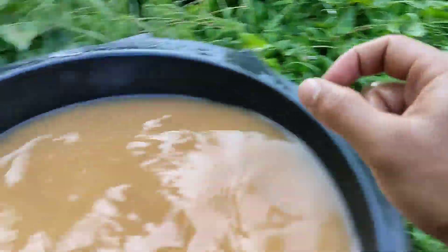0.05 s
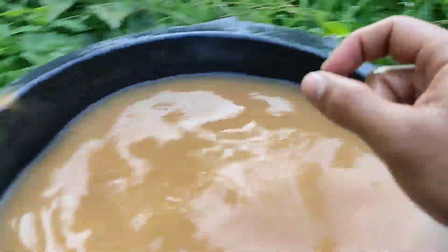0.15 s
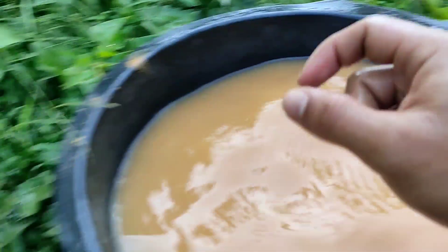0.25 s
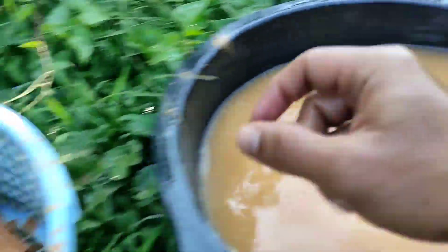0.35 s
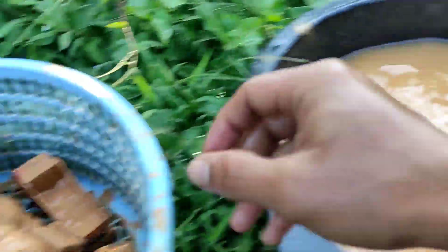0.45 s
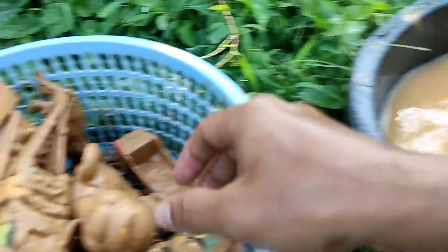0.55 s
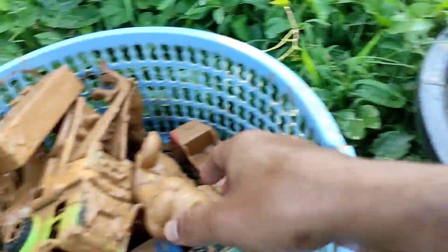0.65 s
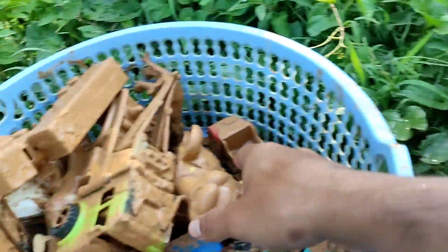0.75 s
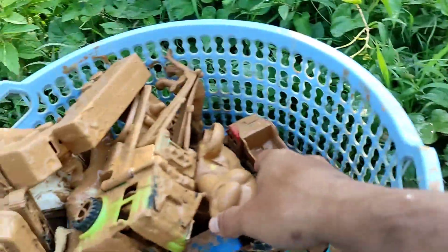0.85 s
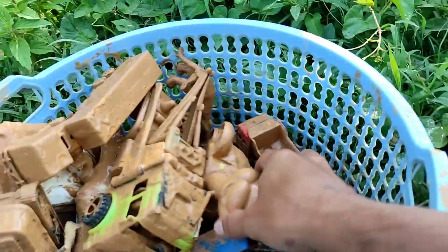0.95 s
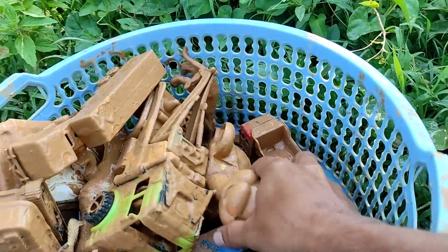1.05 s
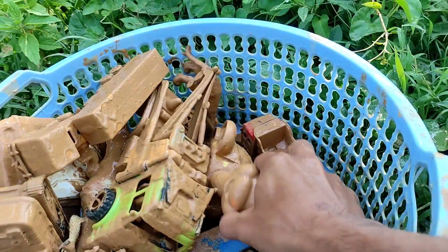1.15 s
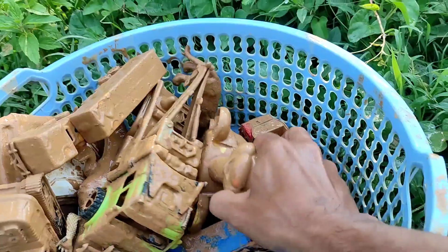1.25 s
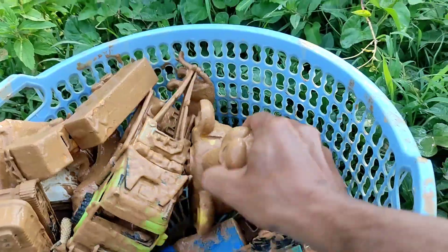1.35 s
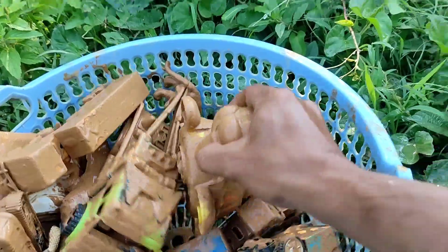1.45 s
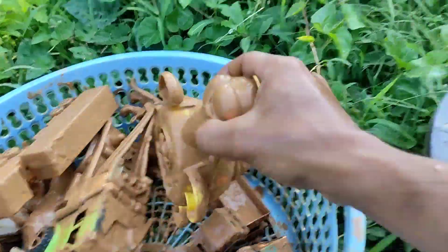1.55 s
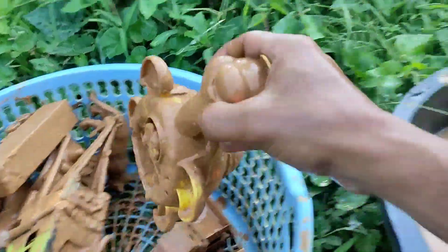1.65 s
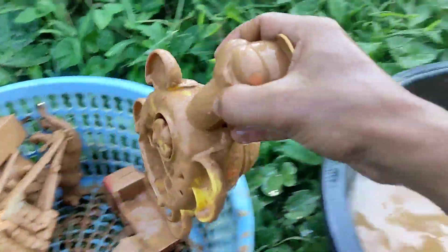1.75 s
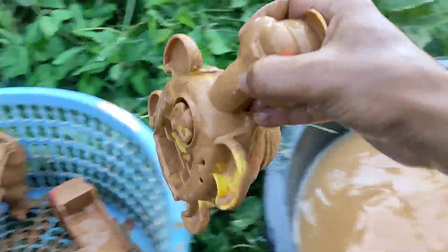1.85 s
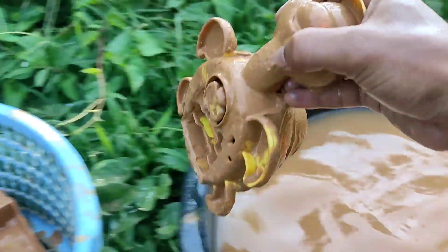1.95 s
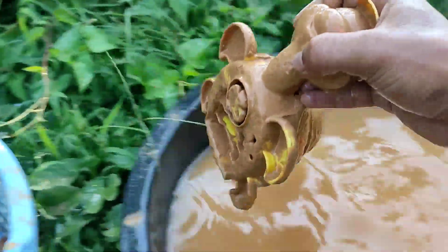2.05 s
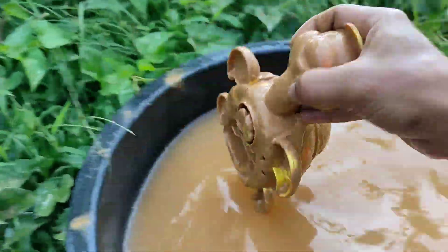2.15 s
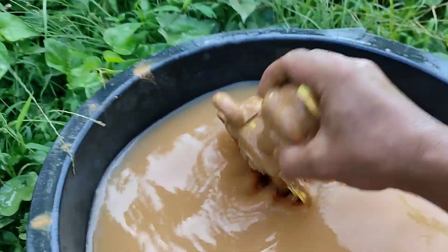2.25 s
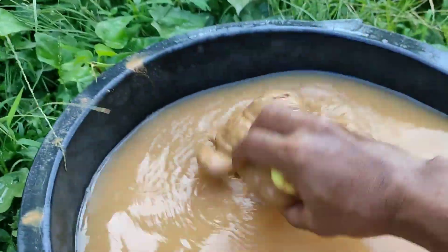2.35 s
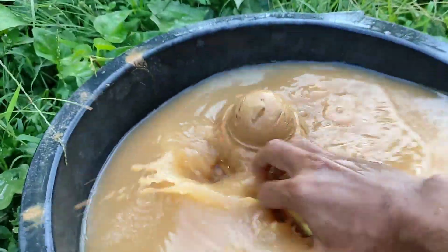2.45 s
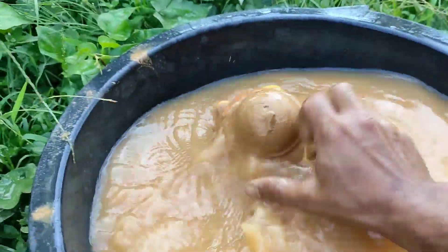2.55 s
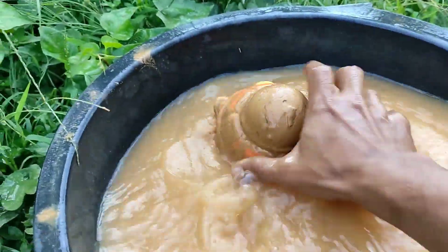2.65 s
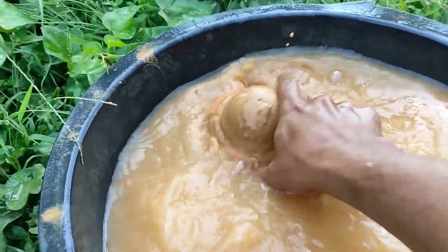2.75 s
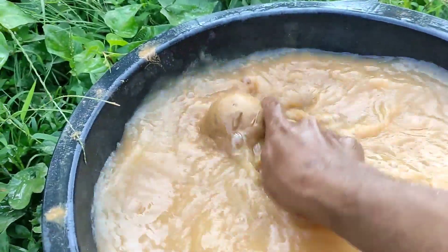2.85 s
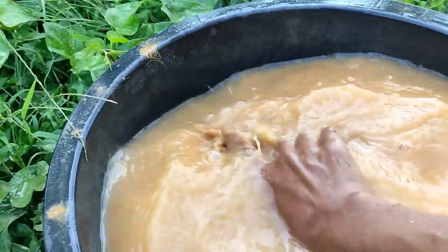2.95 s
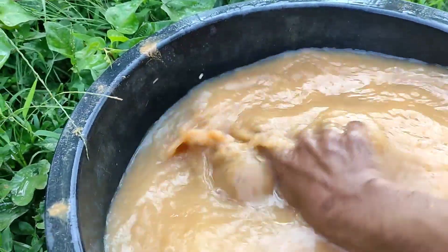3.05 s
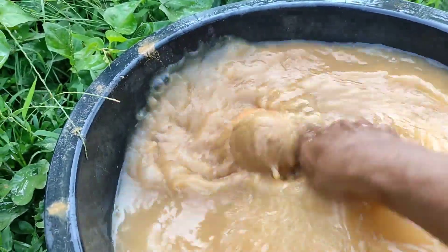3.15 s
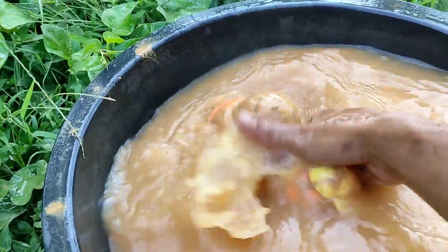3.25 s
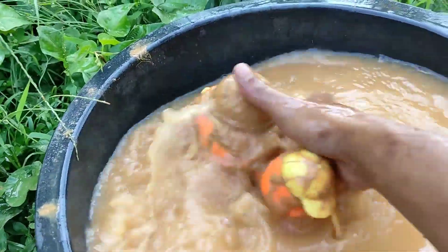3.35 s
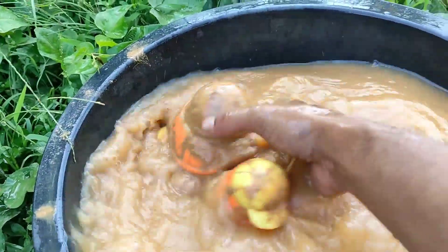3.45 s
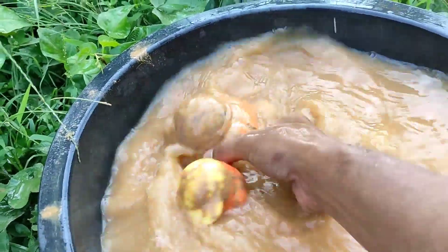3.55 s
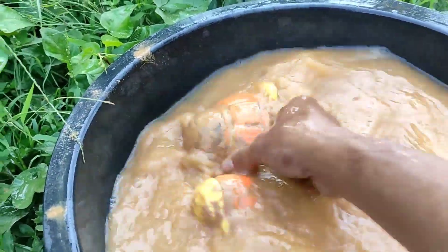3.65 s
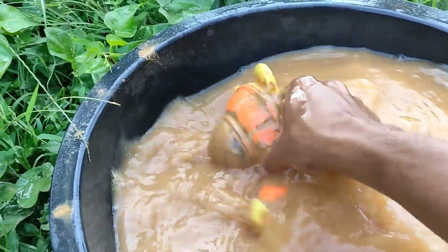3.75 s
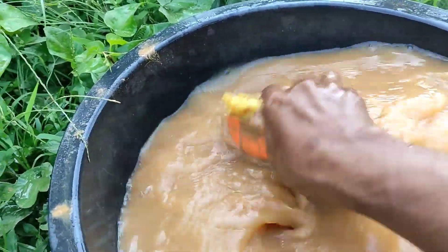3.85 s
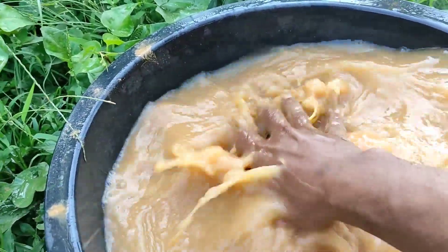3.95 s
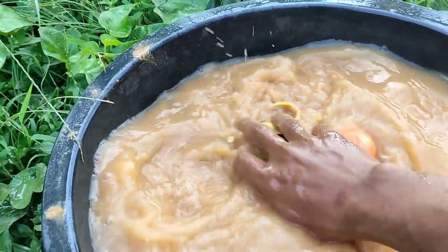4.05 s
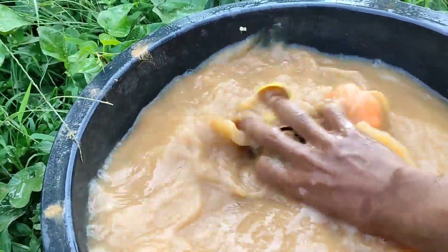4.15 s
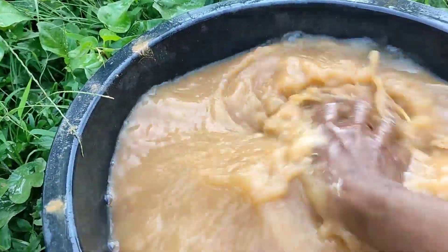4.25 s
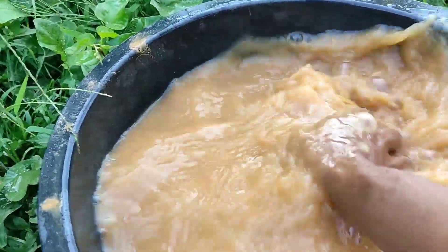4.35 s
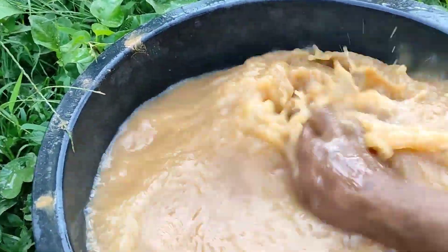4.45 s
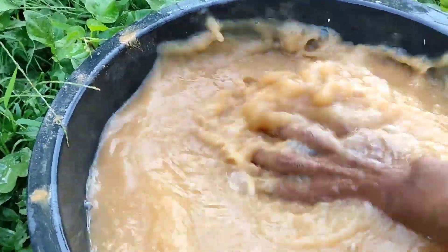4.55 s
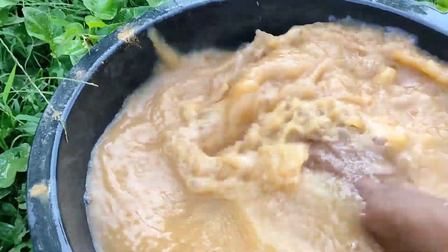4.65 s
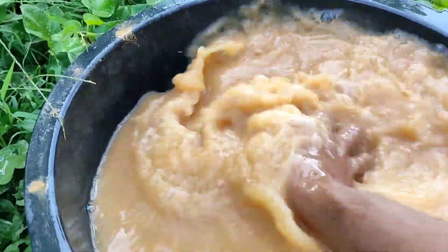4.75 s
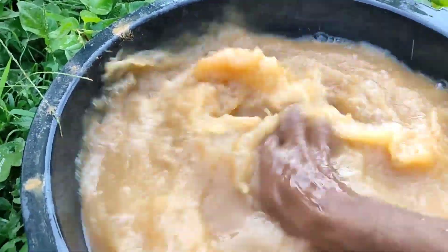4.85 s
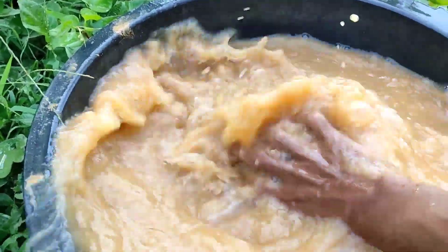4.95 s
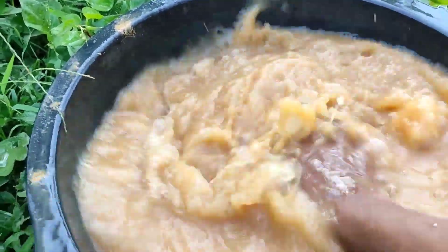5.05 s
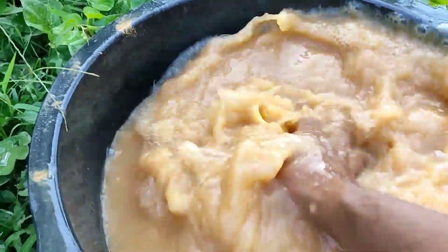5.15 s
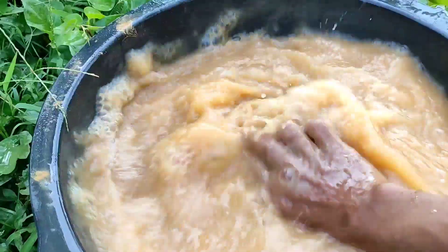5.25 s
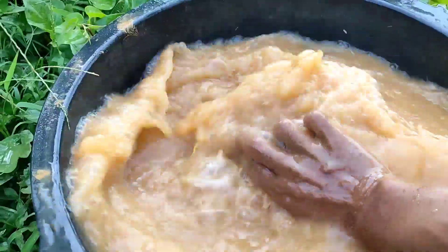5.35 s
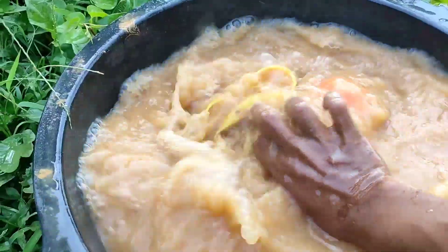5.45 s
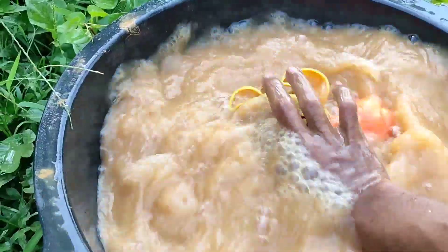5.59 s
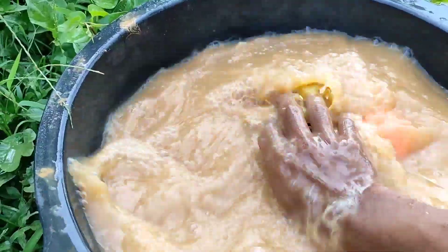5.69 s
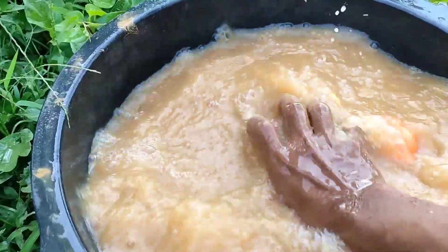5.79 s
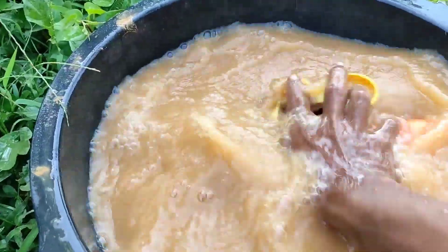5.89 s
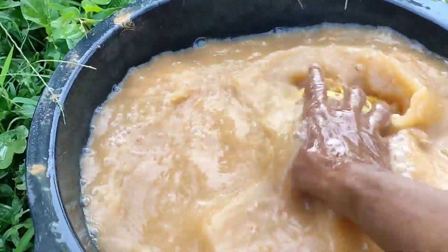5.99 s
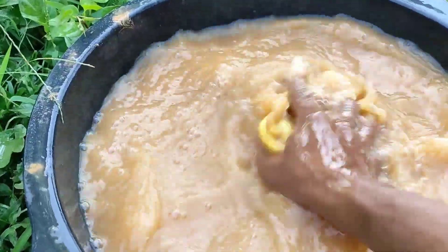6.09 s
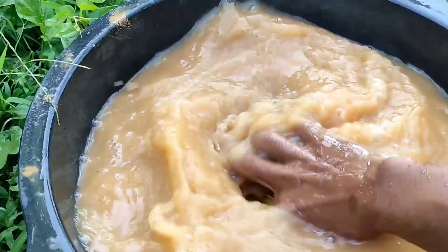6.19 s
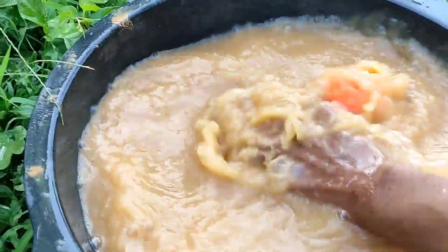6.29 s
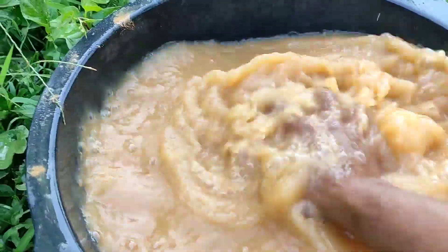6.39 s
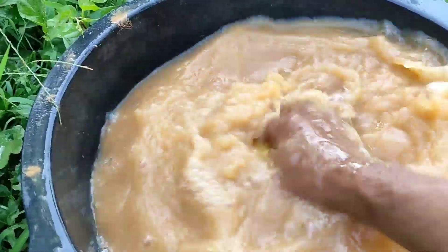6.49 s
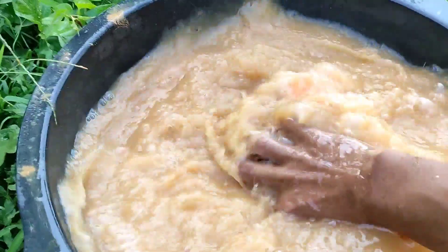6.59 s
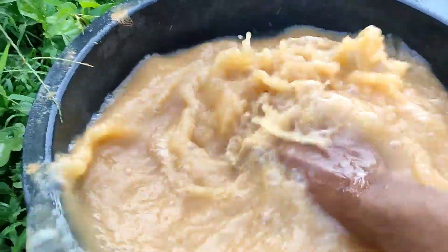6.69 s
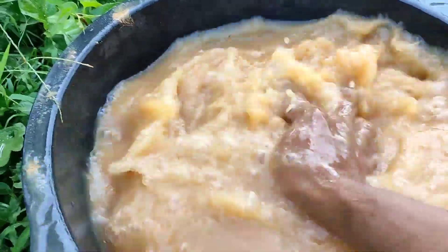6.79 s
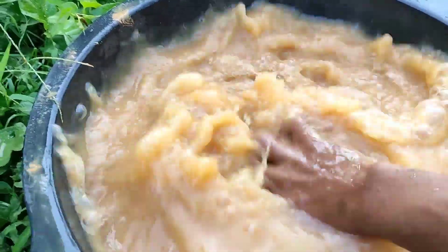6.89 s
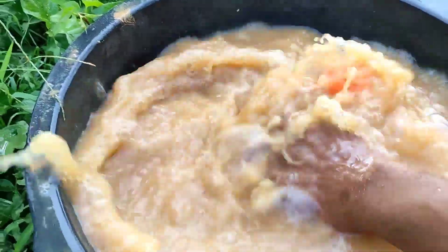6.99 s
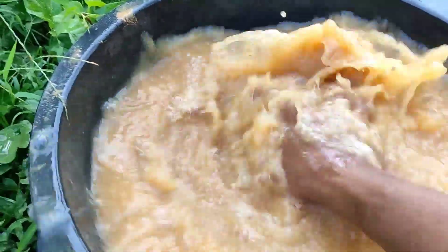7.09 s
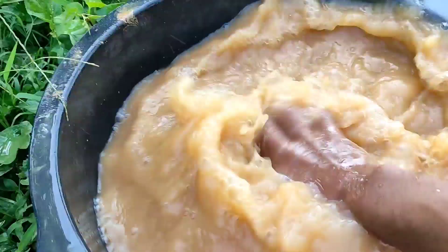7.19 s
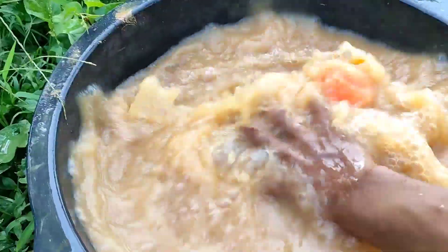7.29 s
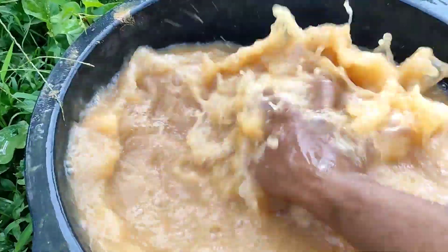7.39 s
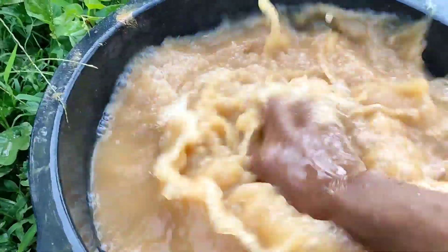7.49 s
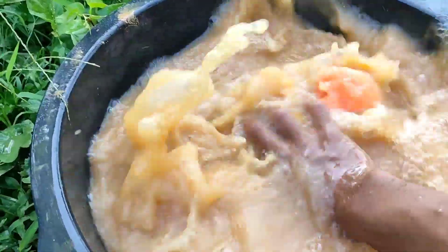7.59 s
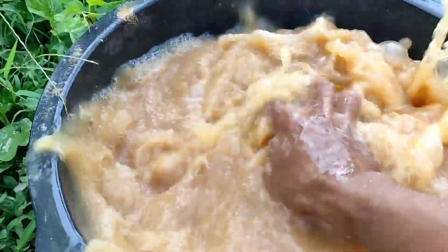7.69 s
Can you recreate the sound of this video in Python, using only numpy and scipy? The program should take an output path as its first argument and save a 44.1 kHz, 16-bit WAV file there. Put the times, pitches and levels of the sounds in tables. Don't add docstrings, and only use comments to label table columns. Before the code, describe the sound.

Faint taps and a short plastic scrape give way to close, wet sloshing, bubbly gulps and crisp droplets as a hand churns water in a tub.

```python
import sys
import numpy as np
from scipy import signal
from scipy.fft import rfft, irfft, next_fast_len
from scipy.io import wavfile
from scipy.ndimage import uniform_filter1d, map_coordinates

SR = 44100
rng = np.random.default_rng(int(sys.argv[2]) if len(sys.argv) > 2 else 0)


def amplitude_ratio(level_db):
    exponent = np.asarray(level_db, float) / 20
    return 10 ** exponent


def waveform_to_disk(signal):
    frames = np.transpose(np.atleast_2d(signal))
    scaled = np.clip(frames, -1, 1) * 32767
    samples = np.round(scaled).astype(np.int16)
    wavfile.write(sys.argv[1], SR, samples)


N = 340893


def unit(x):
    return x / np.sqrt(np.mean(x ** 2) + 1e-20)


def along(points, hz):
    f, v = np.transpose(points)
    return np.interp(np.log(hz + 1), np.log(f + 1), v)


def gains(*tables):
    t, total = np.arange(N) / SR, 0
    for rows in tables:
        s, *columns = np.transpose(rows)
        total = total + np.array([amplitude_ratio(np.interp(t, s, db, -120, -120)) for db in columns])
    return total


def wobble(rate):
    knots = rng.standard_normal(int(N * rate / SR) + 4)
    return map_coordinates(knots, [np.arange(N) * rate / SR])


def filtered(x, response):
    m = next_fast_len(N + 8192)
    return irfft(rfft(x, m) * response(np.fft.rfftfreq(m, 1 / SR)), m)[..., :N]


def rush(spectrum, lag_s, patchy_db):
    z = signal.stft(rng.standard_normal((2, N)), nperseg=256)[2]
    patches = uniform_filter1d(rng.standard_normal(z.shape[1:]), size=6, axis=0)
    patches = uniform_filter1d(patches, size=5, axis=1)
    pair = signal.istft(z * amplitude_ratio(patchy_db * unit(patches)), nperseg=256)[1][:, :N]

    def mid_and_side(hz):
        coherence = .97 * np.exp(-.5 * (2 * np.pi * hz * lag_s) ** 2)
        turn = np.arccos(coherence) / 2
        return amplitude_ratio(along(spectrum, hz)) * [np.cos(turn), np.sin(turn)]

    mid, side = filtered(pair, mid_and_side)
    return unit(np.array([mid + side, mid - side]))


def bubbles(s, db, first_hz, last_hz, swell_s, fade_s, lag_s, size):
    columns = (s, db, first_hz, last_hz, swell_s, fade_s)
    s, db, first_hz, last_hz, swell_s, fade_s = (np.asarray(v, float)[:, None] for v in columns)
    place = rng.standard_normal((len(s), 2))
    start = np.round((s - 2 * swell_s) * SR).astype(int) + np.arange(size)
    glide = (last_hz - first_hz) / (.75 * (swell_s + fade_s))
    top = 1.6 * (swell_s + fade_s)
    out = []
    for side in (.5, -.5):
        t = start / SR - s - side * lag_s * place[:, :1]
        swelling = -.8 * t / swell_s + (t / swell_s / 1.3) ** 8
        fading = .6 * t / fade_s + .4 * (t / fade_s) ** 3
        shape_db = -8 * np.where(t < 0, swelling, fading)
        since = t + swell_s
        cycles = first_hz * since + glide * np.where(since < top, since ** 2 / 2, top * (since - top / 2))
        wave = amplitude_ratio(db + shape_db + 0.5 * side * place[:, 1:]) * np.sin(2 * np.pi * cycles)
        out.append(np.bincount(np.clip(start, 0, N).ravel(), wave.ravel(), N + 1)[:N])
    return np.array(out)


def swarm(count, low_hz, high_hz, cycles, rise, spread_db, size):
    u = rng.random((count, 5))
    hz = low_hz * (high_hz / low_hz) ** u[:, 1]
    life = cycles * (0.4 + 1.272 * u[:, 2]) / hz
    db = -spread_db * np.log(1 - .94 * u[:, 3]) + 10 * np.log10(hz / life / hz ** .5)
    last_hz = hz * (1 + rise * u[:, 4])
    return unit(bubbles(u[:, 0] * N / SR, db, hz, last_hz, 0.395 * life, life, lag_s=.00012, size=size))


# frequency in Hz, level in dB.
FIELD_SPECTRUM = [(15, -49), (25, -26), (78, -5), (135, -2.5), (309, -14), (1740, -28.5), (4900, -32),
                  (5600, -35.5), (7800, -35.5), (9400, -25.5), (10500, -29.5), (12500, -34.5), (15300, -43),
                  (16000, -60)]
# time in seconds, level in dB.
TRAFFIC_HUM = [(0.0, -52), (1.698, -50), (2.466, -48), (4.165, -46.5), (4.488, -54), (5.41, -49.5),
               (6.615, -48.5), (7.728, -44.5)]


def field():
    far = rush(FIELD_SPECTRUM, lag_s=0.00051, patchy_db=1.24)
    low = filtered(far, lambda f: 1 / (1 + (f / 250) ** 4))
    wing = np.sin(np.pi * 142 * np.arange(N) / SR) ** 4
    buzz = filtered(rng.standard_normal((2, N)), lambda f: np.exp(-.5 * ((f - 11800) / 260) ** 2))
    hum = gains(TRAFFIC_HUM)[0] * amplitude_ratio(6.5) * low
    return hum + amplitude_ratio(-43.0) * (far - low) + amplitude_ratio(-60.5 + wobble(0.22)) * unit(wing * buzz)


# frequency in Hz, reverberation time T60 in seconds.
YARD_DECAY = [(300, 0.082), (2000, 0.083), (10000, 0.041)]


def yard(x):
    hz, t, z = signal.stft(rng.standard_normal((2, SR // 5)), SR, nperseg=128)
    tail = signal.istft(z * amplitude_ratio(-60 * t / along(YARD_DECAY, hz)[:, None]), SR, nperseg=128)[1]
    return signal.fftconvolve(x, tail / np.linalg.norm(tail[0]), axes=1)[:, :N]


# time in seconds, peak in dB, mode in Hz, T60 in seconds.
TAPS = [(0.0033, -30, 143, 0.24), (0.14, -30, 110, 0.29), (.141, -25, 235, 0.19), (.139, -29, 1300, 0.027),
        (0.034, -25.5, 420, 0.025), (.115, -31, 1300, 0.035), (.094, -35, 10000, .03),
        (1.465, -18, 2100, 0.1), (0.52, -33, 570, 0.044), (3.895, -20.5, 710, 0.024),
        (6.043, -19, 1490, 0.021), (0.074, -13, 3280, 0.0042), (2.2, -42, 820, 0.47),
        (6.89, -16.5, 370, 0.24), (0.258, -38, 12000, 0.01), (.82, -33, 11500, .008),
        (4.255, -26, 140, 0.12), (2.021, -34, 8000, .03), (3.087, -20.5, 256, 0.063),
        (5.28, -32, 150, 0.09), (5.68, -18.5, 206, 0.046), (7.235, -5, 360, 0.019)]


def knocks():
    out, t = np.zeros((2, N)), np.arange(SR // 5) / SR
    for s, db, hz, t60 in TAPS:
        drift = np.cumsum(rng.standard_normal(len(t))) * 0.75 * np.sqrt(hz / SR)
        contact = 1 - np.exp(-(t * hz / 0.5) ** 2)
        tap = amplitude_ratio(db - 60 * t / t60) * contact * np.sin(2 * np.pi * hz * t + drift)
        out[:, round(s * SR):][:, :len(t)] += tap
    return out


# frequency in Hz, level in dB.
BASKET_SPECTRUM = [(110, -47), (180, -33), (244, 0.5), (425, -4), (627, -13), (882, -5), (2010, -3.5),
                   (3000, -17), (3900, -23), (6600, -120)]
# frequency in Hz, level in dB.
FOAM_SPECTRUM = [(500, -57), (1300, 0.5), (2000, -3), (4600, -5.5), (6600, -10.5), (7200, -13),
                 (8850, -6.5), (12000, -11.5), (14900, -16.5), (16300, -24)]
# time in seconds, pressure in dB, sliding speed from 0 to 1.
TOY_DRAG = [
    (1.251, -62, 0.2),
    (1.303, -41.5, 0.43),
    (1.341, -41.5, 0.12),
    (1.421, -35.5, 0.12),
    (1.471, -44, 0.82),
    (1.519, -31, 0.4),
    (1.616, -32, 0.03),
    (1.672, -42, 0.22),
    (1.698, -56, 0.1),
]


def drag():
    s, pressure_db, speed = np.transpose(TOY_DRAG)
    shell_db = pressure_db - 12 + 33 * speed
    grit_db = pressure_db - 7.5 + 21.5 * speed
    rub, shell, grit = gains(np.transpose([s, pressure_db, shell_db, grit_db]))
    slips = amplitude_ratio(2.8 * wobble(230) + 1.1 * wobble(40))
    scrape = slips * rush(BASKET_SPECTRUM, lag_s=.00015, patchy_db=2)
    dull = filtered(scrape, lambda f: 1 / (1 + (f / 1100) ** 6))
    gritty = slips * rush(FOAM_SPECTRUM, lag_s=0.00013, patchy_db=-3.0)
    return rub * unit(dull) + shell * unit(scrape - dull) + grit * unit(gritty)


# time in seconds, effort in dB.
STIR_EFFORT = [(2.29, -65), (2.44, -29), (2.55, -31.5), (2.64, -44.5), (3.68, -42), (3.77, -46.5),
               (3.93, -45), (3.98, -32), (4.3, -35), (4.68, -25), (4.9, -42), (5.1, -24), (5.5, -34),
               (6.03, -39), (6.3, -35), (6.575, -28), (6.63, -25.5), (7.73, -24.5)]
# crest in seconds, crest level in dB, ebb in seconds,
# spray over churn in dB.
STROKE_WAVES = [(0.001, -32, 0.02, -26), (0.086, -35.5, 0.1, 2), (2.479, -50, 0.039, -19),
                (2.591, -31.5, 0.088, 0.5), (2.768, -30.5, 0.1, -6), (2.861, -29.5, 0.034, -3.5),
                (2.94, -28, 0.072, 1.5), (3.029, -21.5, 0.017, -1), (3.103, -27, 0.042, -4),
                (3.405, -54, 0.52, 14), (3.736, -33.5, 0.028, -10), (4.117, -29, 0.068, 6),
                (4.53, -54, 0.19, 16), (4.684, -22, 0.03, -17), (4.793, -24.5, 0.12, -12),
                (4.965, -22, 0.1, -5), (5.084, -22.5, 0.049, -4.5), (5.343, -27, 0.12, -6),
                (5.449, -22, 0.072, -20), (5.549, -32, 0.092, 4), (5.767, -26, 0.027, -7),
                (5.934, -32.5, 0.031, -9), (6.088, -27, 0.021, -12), (6.253, -34, 0.074, 4),
                (6.371, -23, 0.17, -6.5), (7.11, -31, 0.52, -26), (7.444, -30, 0.086, -0.5),
                (7.601, -23.5, 0.1, -5)]
# time in seconds, dip in dB, half length in seconds.
HAND_TURNS = [
    (2.624, -30, 0.0096),
    (5.229, -9, 0.014),
    (5.526, -6, 0.025),
    (6.572, -8, 0.011),
    (7.253, -9, 0.0048),
]


def stirring():
    t = np.arange(N) / SR
    both = gains(STIR_EFFORT) * amplitude_ratio([[0], [-3]])
    ebb_db, build, crest = 37, 0.87, 1.45
    for s, db, ebb_s, spray_db in STROKE_WAVES:
        away = np.where(t < s, (s - t) / build, t - s) / ebb_s
        both = both + amplitude_ratio(db - ebb_db * away ** crest) * amplitude_ratio([[0], [spray_db]])
    dip_db = sum(db * np.exp(-((t - s) / half_s) ** 2) for s, db, half_s in HAND_TURNS)
    return both * amplitude_ratio(dip_db)


# frequency in Hz, level in dB.
TUB_SPECTRUM = [(71, -41), (120, -23.5), (424, -2), (623, -4.5), (806, -3), (1110, -9.5), (1550, -7),
                (1930, -18), (2600, -19), (3380, -15), (5720, -120)]


def slosh():
    churn, spray = stirring()
    busy = np.clip(uniform_filter1d(spray, size=9000) / amplitude_ratio(-30), 0, 1)
    surge = wobble(28)

    gurgle = swarm(count=2900, low_hz=150, high_hz=2600, cycles=4.4, rise=.45, spread_db=2.9, size=1500)
    gurgle = unit(filtered(gurgle, lambda f: amplitude_ratio(along(TUB_SPECTRUM, f))))
    body = gurgle + amplitude_ratio(-12 + 4 * busy) * rush(TUB_SPECTRUM, lag_s=.00014, patchy_db=3)
    deep = filtered(body, lambda f: 1 / (1 + (f / 1000) ** 6))
    body = body - deep + amplitude_ratio(-11.0 + 5.9 * busy) * deep

    fizz = swarm(count=6500, low_hz=2000, high_hz=15500, cycles=2.4, rise=.15, spread_db=5, size=260)
    fizz = unit(filtered(fizz, lambda f: amplitude_ratio(along(FOAM_SPECTRUM, f))))
    foam = fizz + amplitude_ratio(-5 + 9 * busy) * rush(FOAM_SPECTRUM, lag_s=.00012, patchy_db=4)

    body = unit(body * amplitude_ratio((1 - .5 * busy) * (1.8 * surge + 1.2 * wobble(18))))
    foam = unit(foam * amplitude_ratio((1.8 - 1.2 * busy) * (2.8 * surge + 1.8 * wobble(60))))
    return amplitude_ratio(-1.5) * churn * body + amplitude_ratio(-0.5) * spray * foam


# time in seconds, peak in dB, ring in Hz.
FALLING_DROPS = [(0.075, -24, 4270), (2.327, -21, 3060), (2.4217, -15.5, 2930), (2.447, -19.5, 3450),
                 (2.473, -13, 3440), (2.5992, -13.5, 3270), (2.6793, -14.5, 2610), (3.019, -28, 3470),
                 (3.3515, -22, 2550), (3.3818, -18, 3330), (3.4, -20.5, 3300), (3.629, -23.5, 3030),
                 (3.968, -11.5, 3500), (4.0264, -13.5, 3330), (4.398, -16, 2260), (4.766, -20.5, 2500),
                 (4.919, -21, 3020), (4.949, -16.5, 3140), (5.164, -16.5, 2830), (5.254, -25, 4580),
                 (5.28, -19, 2550), (5.328, -16.5, 4300), (5.657, -18.5, 4140), (5.945, -24.5, 3700),
                 (6.083, -14.5, 5270), (6.362, -9.5, 4300), (6.392, -16, 4650), (6.476, -16, 2850),
                 (6.5986, -27, 3080), (7.4356, -19, 3260)]
# time in seconds, peak in dB, ring in Hz.
FLUNG_DROPLETS = [(2.5083, -5.5, 8840), (2.925, -18.5, 9500), (3.1925, -23, 9000), (3.2078, -14.5, 9100),
                  (3.457, -28.5, 6100), (3.488, -21.5, 8900), (3.5374, -14.5, 7250), (3.556, -20.5, 11500),
                  (3.6387, -16.5, 8200), (3.6787, -22.5, 8650), (3.996, -12, 8440), (4.061, -13, 8340),
                  (5.006, -11.5, 8200), (5.543, -17, 6240), (5.762, -23, 6130), (5.8198, -9.5, 12400),
                  (6.18, -15.5, 9830), (6.9935, -10.5, 8530), (7.266, -10.5, 11200), (7.417, -13.5, 11400),
                  (7.5325, -11.5, 11200)]
# time in seconds, peak in dB, ring in Hz.
WAVE_SPATTER = [(3.1217, -22, 2230), (3.217, -22, 4270), (3.604, -27, 5770), (4.0696, -19, 4570),
                (4.1075, -18.5, 2360), (4.3498, -20, 4000), (6.3536, -21, 3200), (6.4418, -19.5, 2850),
                (6.4837, -21.5, 4850), (6.521, -31, 2360), (6.6134, -20, 2840), (6.646, -22, 3450),
                (6.6582, -21, 3300), (6.7703, -19, 2820), (6.7829, -17.5, 2280), (6.8805, -20, 4310),
                (6.9674, -17, 2350), (6.9817, -13.5, 3950), (7.0828, -20, 2180), (7.594, -13.5, 2700)]
# time in seconds, peak in dB, ring in Hz.
WAVE_MIST = [(2.3271, -23, 9800), (2.475, -10.5, 12000), (2.6087, -17.5, 8700), (2.966, -21, 8500),
             (3.6921, -24, 9300), (4.0849, -21, 8870), (4.119, -16.5, 13870), (4.524, -17.5, 5850),
             (5.058, -18, 9220), (5.089, -17, 11070), (5.1736, -16, 8900), (5.3427, -17, 9560),
             (5.3455, -17.5, 6340), (5.41, -15.5, 9400), (5.657, -23, 12530), (6.2662, -23, 9800),
             (6.3728, -23, 10250), (6.643, -19, 9600), (6.8234, -16.5, 7900), (6.837, -16, 9000),
             (6.8944, -21, 8610), (6.959, -16, 8870), (7.1017, -18.5, 10900), (7.1766, -15, 12060),
             (7.2217, -20.5, 9000), (7.5144, -18, 8600), (7.578, -15.5, 12100), (7.6897, -14, 15460)]


def drops():
    large = FALLING_DROPS + FLUNG_DROPLETS
    s, db, hz = np.transpose(large + WAVE_SPATTER + WAVE_MIST)
    crack_db = db + np.repeat([7.5, 7, 9.5], [len(large), len(WAVE_SPATTER), len(WAVE_MIST)])
    ring = bubbles(s + 0.0014, db + 1.0, hz, 1.077 * hz, 2.74 / hz, 6 / hz, lag_s=0.00023, size=500)

    t = np.arange(900) / SR / .0012
    crack = t ** 2 * np.exp(-1.3 * t)
    burst = np.zeros((2, N + 900))
    for at, level_db, small in zip(s, crack_db, hz > 6000):
        burst[int(small), round((at - .001) * SR):][:len(t)] += amplitude_ratio(level_db) * 0.82 * crack
    spray = rush(FOAM_SPECTRUM, lag_s=.00012, patchy_db=2)
    bright = filtered(spray, lambda f: 1 / (1 + (6500 / (f + 1)) ** 4))
    return ring + burst[0, :N] * (spray - 0.18 * bright) + burst[1, :N] * (bright + 0.29 * spray)


# peak in seconds, level in dB, first pitch in Hz,
# life in ms.
SLAPPED_POPS = [(2.4536, -12.5, 1250, 1.4), (2.476, -15.5, 1270, 5.4), (2.5298, -16, 774, 5.1),
                (2.7116, -7, 810, 2.6), (2.7121, -18.5, 430, 10.6), (2.7536, -18, 1600, 4.5),
                (2.7701, -4.5, 1075, 6), (3.497, -21, 1560, 6.1), (3.575, -20, 754, 2.8),
                (4.0474, -18.5, 481, 20), (4.17, -19.5, 765, 24), (4.321, 0, 1440, 2.8),
                (4.327, -7.5, 1200, 5), (4.6636, -8, 753, 7.9), (4.875, -11.5, 733, 9.5),
                (5.05, -16, 740, 9.2), (5.0973, -18, 698, 18), (5.1655, -12.5, 990, 4),
                (5.267, -9, 1370, 1.4), (5.3167, -5.5, 720, 3.1), (5.3181, -11.5, 270, 8.1),
                (5.444, -13, 910, 9.8), (5.659, -16.5, 1670, 2.2), (6.487, -17, 990, 7.7),
                (6.729, -15.5, 694, 18.6), (6.977, -10.5, 700, 4.2), (6.999, -7.5, 406, 7.3),
                (7.1164, -12, 744, 16), (7.285, -19, 385, 35.4), (7.5457, -11, 335, 13)]
# peak in seconds, level in dB, first pitch in Hz, life in ms.
SAGGING_POCKETS = [(0.075, -19.5, 1340, 4.6), (2.4554, -20, 746, 6.7), (2.4747, -21.5, 640, 6.5),
                   (2.5103, -12.5, 2500, 1.4), (2.926, -15.5, 1860, 3.3), (3.091, -12.5, 1083, 4.6),
                   (3.726, -21.5, 544, 5), (4.0293, -23.5, 1770, 2.7), (4.126, -15.5, 386, 7.2),
                   (4.1326, -21, 810, 19), (4.633, -8.5, 1800, 1.7), (4.6965, -6.5, 1560, 1.7),
                   (5.1476, -11.5, 1390, 2.1), (5.3525, -12, 493, 21), (5.428, -4, 574, 2.9),
                   (5.4609, -9, 1088, 12.7), (6.079, -22, 1670, 2.3), (6.3413, -7, 1210, 1.6),
                   (6.682, -10.5, 1685, 7.6), (7.014, -12, 1840, 7.1), (7.083, -9.5, 1640, 2.8),
                   (7.084, -13, 910, 17.6), (7.1328, -11.5, 1045, 8.4), (7.2651, -9, 1310, 7.5),
                   (7.5191, -15, 468, 13), (7.6657, -6.5, 536, 5.7)]
# peak in seconds, level in dB, first pitch in Hz,
# life in ms, pitch rise as a share.
SLOW_GULPS = [(2.378, -26, 2150, 2.7, 0.057), (2.408, -26, 440, 12, 0.11), (2.425, -17, 2950, 4, .03),
              (2.681, -22, 2720, 5, 0.14), (5.44, -16.5, 387, 18, .3), (2.446, -28, 265, 10.8, 0.033),
              (2.477, -26, 227, 22.4, .05), (4.7, -22.5, 248, 9, 0.089), (4.98, -20, 450, 13, -0.011),
              (5.083, -14, 290, 10.8, 0.04), (4.925, -22, 854, 14, 0.0053), (2.415, -8.5, 848, 15.5, 0.7),
              (2.424, -7, 1410, 6.7, -0.032), (2.675, -20.5, 1074, 29, 0.28), (2.854, -24, 397, 14, 0.65),
              (2.364, -29, 372, 18, 0.1), (2.895, -25, 600, 7.6, 0.19), (2.9292, -15, 1040, 7, -0.25),
              (3.0301, -23.5, 672, 12, 0.2), (3.096, -18.5, 434, 11.7, -0.12),
              (3.283, -35, 1250, 6, -0.048), (3.328, -31, 1240, 7.3, 0.25), (3.518, -35, 1360, 6, 0.058),
              (3.741, -25.5, 520, 4.6, -0.062), (4.18, -14.5, 440, 5.2, 0.13),
              (4.595, -15.5, 955, 6.8, 0.019), (4.651, -16.5, 430, 10.7, -0.1), (5.547, -20, 880, 7, 0.23),
              (4.6778, -5, 520, 5.36, 0.042), (5.087, -11, 432, 8.9, 0.16), (6.2416, -17, 405, 11.8, 0.17),
              (6.37, -14.5, 1007, 17, -0.023), (6.4401, -18, 1010, 6.7, 0.015),
              (7.179, -13, 430, 11.4, -0.042), (7.4356, -15.5, 543, 21, 0.54),
              (7.576, -13.5, 1280, 6.7, 0.025)]
# peak in seconds, level in dB, first pitch in Hz,
# life in ms, pitch rise as a share.
FROTH_BLIPS = [(2.4663, -12, 2160.0, 1.4, 0.03), (2.5123, -18.5, 490.0, 6.1, -0.0031),
               (2.5716, -20.5, 1230.0, 5.9, 0.18), (2.5876, -19, 1720.0, 2.3, 0.016),
               (2.797, -18, 700, 2.8, -.1), (2.849, -19, 446, 4.2, 0.019),
               (2.9141, -23.5, 820.0, 6.1, 0.096), (3.0643, -24.0, 550.0, 10, 0.11),
               (3.238, -33.5, 1380, 7.3, 0.03), (3.584, -25.5, 1300.0, 6.1, 0.0099),
               (3.8689, -30, 1360, 8.4, -0.00088), (3.9507, -25.5, 960.0, 7.3, -0.0019),
               (4.0612, -18.5, 1410, 5.5, -0.12), (4.4818, -20, 490.0, 4.2, -0.0086),
               (4.4916, -18, 1380.0, 4.1, -0.032), (4.6913, -15, 800.0, 4, -0.19),
               (5.078, -13.5, 1350, 3.3, 0.12), (5.281, -17, 1660, 3.4, 0.017),
               (5.7566, -21, 1030, 3.1, -0.051), (5.8711, -26, 1330.0, 4.7, -0.014),
               (5.9214, -26, 1500.0, 2.9, -0.15), (5.9472, -19.5, 1370, 2.7, 0.32),
               (6.1199, -28, 1380.0, 8.0, -0.01), (6.145, -22.5, 540.0, 3.3, 0.11),
               (6.181, -22.5, 800, 7.4, 0.25), (6.2566, -18.5, 1540.0, 3.2, 0.018),
               (6.4578, -12, 1370, 2.9, 0.083), (6.5596, -22, 440, 19, 0.19),
               (6.558, -16, 1740, 2.5, -0.05), (6.538, -22, 273, 10.7, 0.16),
               (6.6174, -15.5, 514, 6.9, 0.013), (6.7477, -12.5, 1640, 3.3, -0.16),
               (6.794, -16, 1400, 6.8, -0.056), (6.811, -16, 2170, 2.7, -0.1),
               (6.955, -18.5, 436, 15, 0.18), (6.9684, -16.5, 1340.0, 5.8, 0.026),
               (7.1568, -21, 1540.0, 4.9, 0.073), (7.2385, -18, 1690, 5.6, -0.0033),
               (7.3155, -13.5, 1070, 5.8, 0.38), (7.34, -15.5, 1250, 3.2, 0.15),
               (7.4157, -12.5, 430.0, 4.5, -0.037), (7.4204, -23, 2200.0, 2.4, -0.081),
               (7.4511, -15.5, 790, 7.8, 0.17)]


def pockets():
    onset_ms = 0.58
    pops = [(*row, 0.053 + 0.016 * row[-1], 0.144 + onset_ms / row[-1]) for row in SLAPPED_POPS]
    sags = [(*row, -0.11, 0.153 + onset_ms / row[-1]) for row in SAGGING_POCKETS]
    gulps = [(*row, 0.524) for row in SLOW_GULPS]
    blips = [(*row, 0.35) for row in FROTH_BLIPS]
    s, db, hz, life_ms, rise, swell = np.transpose(pops + sags + gulps + blips)
    life = life_ms / 1000
    swell = np.minimum(swell, .8) * life
    ring = bubbles(s, db, hz, hz * (1 + rise), swell, life - swell, lag_s=.00009, size=5000)

    k = len(pops + sags)
    low_hz = 0.98 * hz[:k]
    thump_s = 0.97 / low_hz
    shut_s = (s - swell)[:k]
    return ring + bubbles(shut_s, db[:k] - 2, low_hz, low_hz, thump_s / 4, thump_s, lag_s=.00009, size=900)


def scene():
    near = pockets() * amplitude_ratio(wobble(300)) + drops() + knocks()
    water = near + amplitude_ratio(-12.5) * yard(near) + slosh() + drag() * amplitude_ratio([[1.4], [-1.4]])
    return filtered(water, lambda f: 1 / (1 + (70 / (f + 1)) ** 4)) + field()


def starved(x):
    hz, _, z = signal.stft(x, SR, nperseg=1536)
    power = uniform_filter1d(np.sum(np.abs(z) ** 2, 0), size=8, axis=0)
    power = power[np.arange(len(hz)) // 8 * 8]
    kept = (power > .55 * uniform_filter1d(power, size=90, axis=0)) | (hz[:, None] < 4200)
    return signal.istft(z * kept, nperseg=1536)[1][:, :N]


def top_cut(x):
    return signal.sosfilt(signal.butter(12, 16530, fs=SR, output="sos"), x)


def record(dry):
    ports = [(3000, -0.17), (8000, 1.5), (15000, -2.5)]  # (Hz, left boost dB)
    top_hz = 15700
    x = filtered(dry, lambda f: amplitude_ratio([[1], [-1]] * along(ports, f)) / (1 + (f / top_hz) ** 200))
    x = starved(x)
    x = x / (1 + np.abs(x) ** 8) ** (1 / 8)
    return top_cut(x)


dry = scene()
out = record(dry)
waveform_to_disk(out)
```